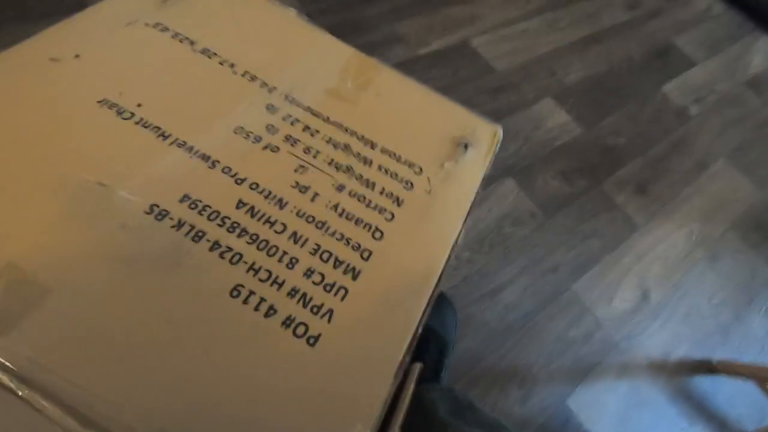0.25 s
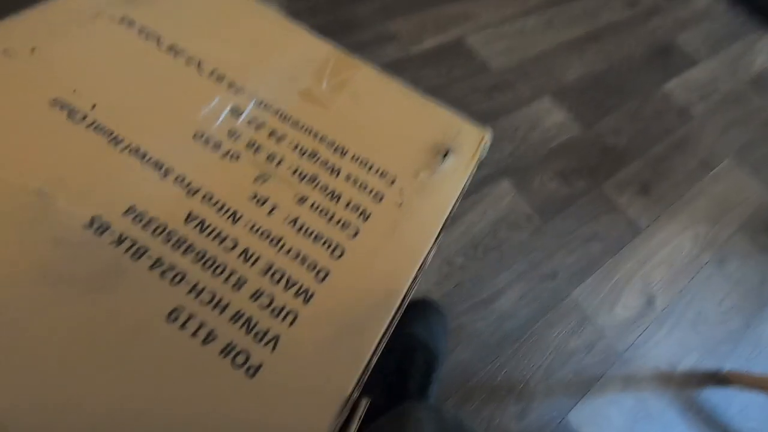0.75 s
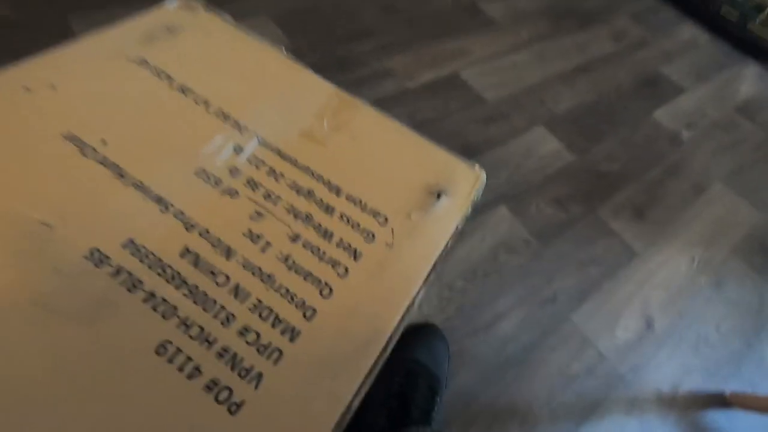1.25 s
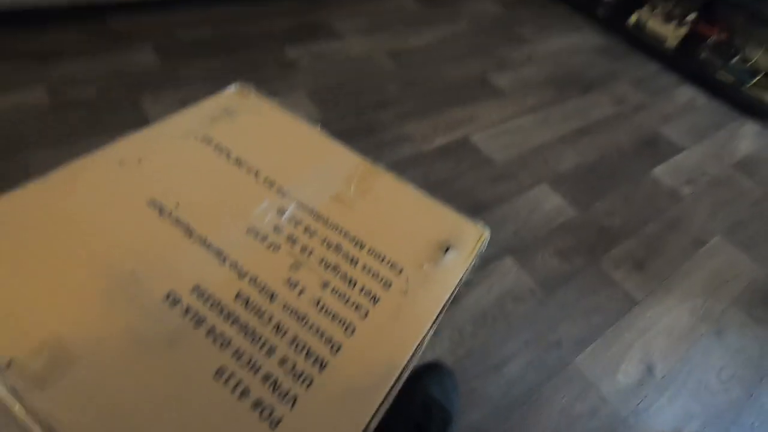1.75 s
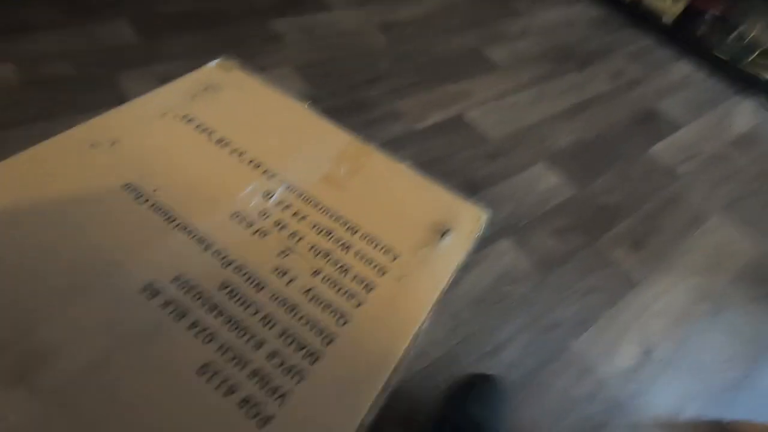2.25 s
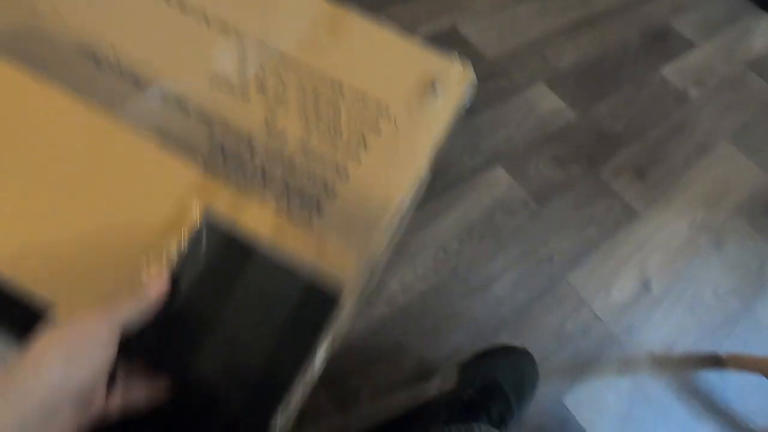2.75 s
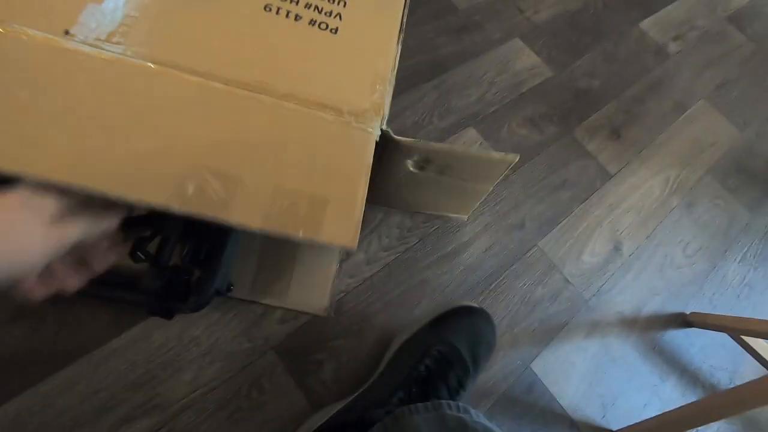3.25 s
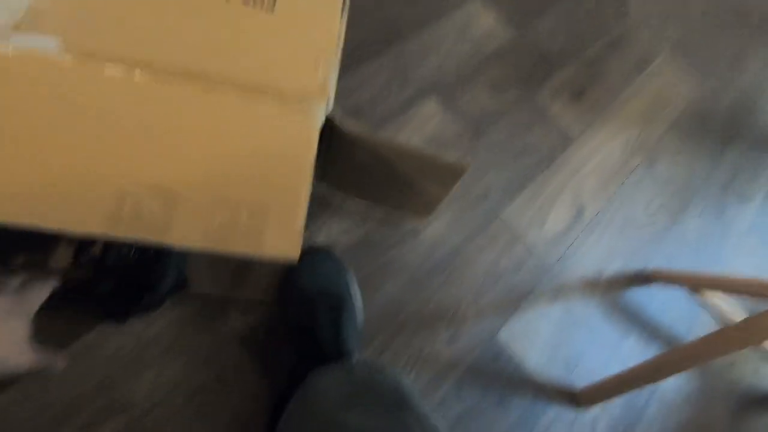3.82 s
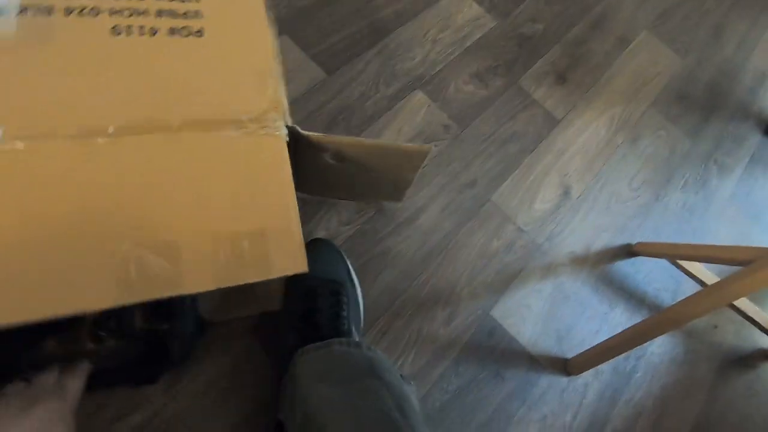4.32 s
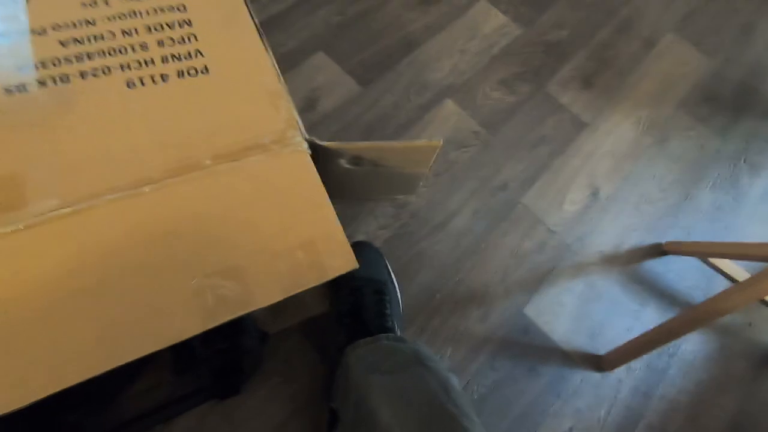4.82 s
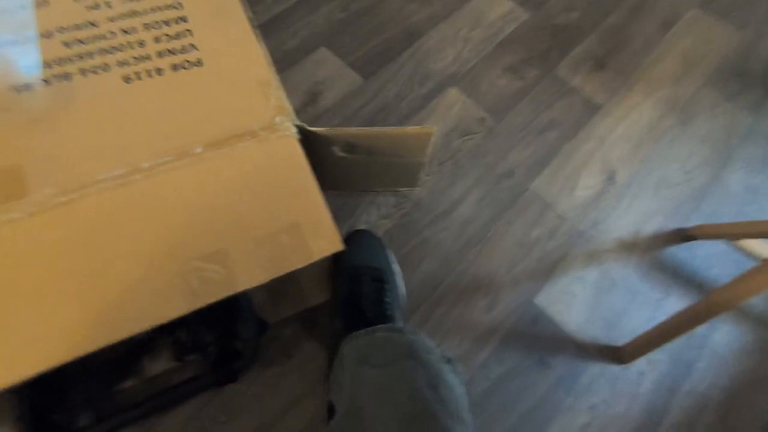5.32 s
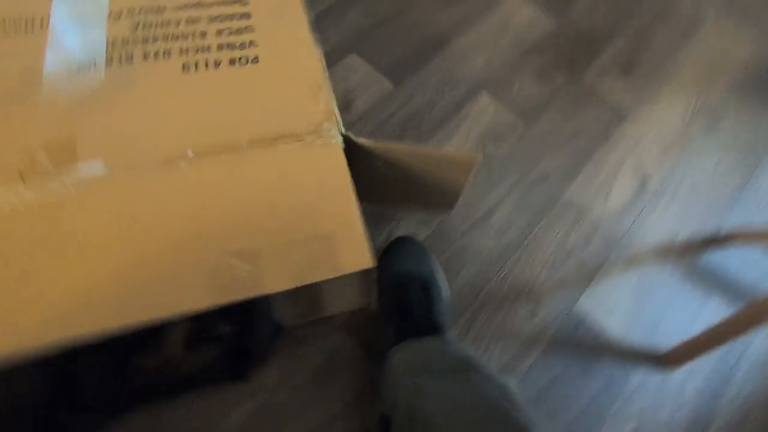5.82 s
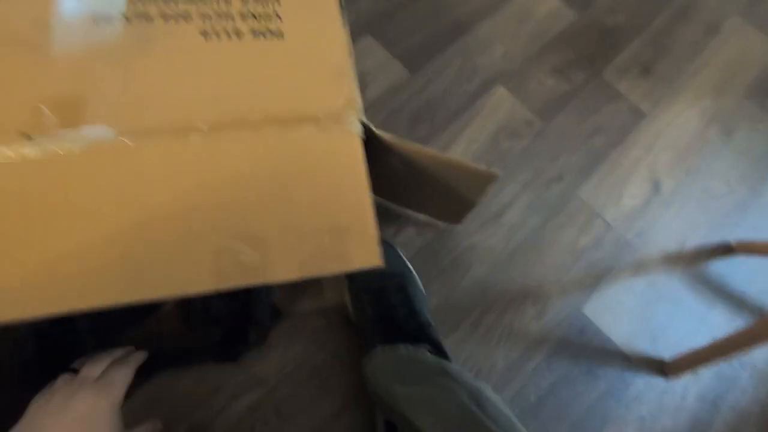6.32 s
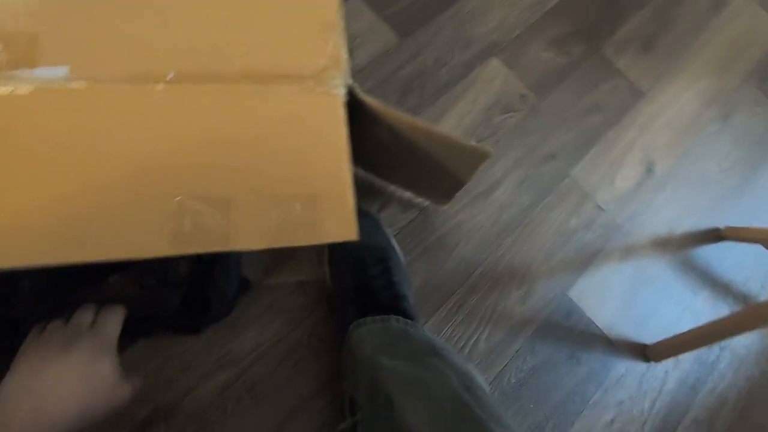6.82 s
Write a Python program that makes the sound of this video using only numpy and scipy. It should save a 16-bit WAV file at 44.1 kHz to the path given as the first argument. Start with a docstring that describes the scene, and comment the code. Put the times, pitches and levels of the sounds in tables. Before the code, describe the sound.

Close up in a quiet room, a large cardboard box is shifted on a hard floor. Rubbing and hollow drumming come with sharp cracks and a run of dull bumps, then thin out. Small crackles lead to a long bright scrape with a short groan and snaps. After a near-lull, a heavier thud and boomy drumming follow, then scattered knocks and rustles over faint hiss and low hum.

```python
"""Large cardboard carton on a hard floor

A carton is tipped, dragged and opened close to a two-port microphone. Paper rubs in swells of shaped noise;
random slips and blows set the panels drumming, and soft low thumps swing below. Folds and tape snap, a small
part pings nearer the right port, corners rasp, an edge groans, a thin tone rings and a stiff edge is rubbed.
Under it lies a quiet room: steady hiss and a low wavering hum, with a short reverberation on the box."""
import sys
import numpy as np
from scipy import signal
from scipy.io import wavfile
from scipy.ndimage import uniform_filter1d

SR = 44100
rng = np.random.default_rng(int(sys.argv[2]) if len(sys.argv) > 2 else 0)


def dump_mix(stems):
    """Bounce the given channels to the path in sys.argv[1] as a 16-bit WAV at rate SR."""
    frames = np.atleast_2d(stems).T  # one column per channel
    limited = np.clip(frames, -1, 1)  # hard clip at full scale
    pcm = np.round(limited * 32767).astype(np.int16)
    wavfile.write(sys.argv[1], SR, pcm)


N = 311787  # length in samples
GRID = np.arange(0, N + 128, 128) / SR  # slow time grid, s
PANEL_SPREAD = 1.085  # the panels swell and fade this much slower than the rubbing

# Each push, pull or fold of the box. Each row: peak time in seconds, rise in seconds, fall in seconds,
# relative rubbing level in dB, relative brightness in dB, relative panel drumming level in dB.
STROKE_ROWS = [(0.0, .05, 0.037, -34, -13, -29), (.13, 0.38, 0.13, -35.5, -1.5, -32.5),
               (.24, 0.27, 0.12, -38, -9, -29), (.44, 0.24, 0.37, -41.5, -5, -37),
               (.69, 0.13, 0.12, -41.5, -9.5, -31), (.85, 0.19, 0.39, -44.5, -7, -35.5),
               (1.05, 0.26, 0.11, -47, -4.5, -55), (1.5, 0.3, 0.45, -47, -2, -41),
               (1.66, 0.2, 0.19, -48.5, -6, -37.5), (1.75, 0.083, 0.079, -51.5, 5, -60),
               (1.886, 0.12, 0.18, -40.5, -3, -44), (2.1, 0.2, 0.43, -50, -1, -40),
               (2.33, 0.11, 0.19, -49, 1, -63), (2.45, 0.056, 0.32, -43.5, 0, -43.5),
               (2.72, 0.17, 1, -35, -5, -34.5), (3.03, 0.6, 0.37, -28.5, -4, -29),
               (3.35, 0.035, 0.058, -52.5, 14, -41), (3.47, 0.12, 0.21, -59, -5, -62),
               (3.62, 0.088, 0.042, -53.5, -22.5, -49.5), (3.86, 0.074, 0.36, -72, -24, -45.5),
               (4.05, 0.19, 0.3, -47.5, 5, -30.5), (4.32, 0.72, 0.34, -34.5, -6.5, -35),
               (4.469, 0.15, 0.39, -35.5, -5, -25.5), (4.779, 0.04, 0.12, -42.5, -5.5, -28),
               (5.05, 1, 0.27, -56.5, -5.5, -68), (5.37, 0.36, 0.18, -55, -6.5, -48.5),
               (5.56, 0.048, 0.12, -43, -6.5, -40.5), (5.72, 0.12, 0.25, -40, -6.5, -32.5),
               (5.863, 0.24, 0.15, -32, -5, -25.5), (6.12, 0.16, 0.47, -51.5, -6, -46),
               (6.421, 0.2, 0.16, -37.5, -4, -27.5), (6.64, 0.31, 0.2, -57.5, -1.5, -45.5),
               (6.8, 0.078, 0.27, -48.5, -9, -41.5), (6.98, 0.17, 1, -43.5, -7, -35.5)]
# The box lands or is knocked. Each row: start in seconds, relative level in dB, settled pitch in Hz,
# time to fall 60 dB in seconds.
THUMP_ROWS = [(0.219, -29, 198, 0.18), (0.287, -20.5, 66, 0.065), (0.38, -17, 150, 0.053),
              (0.689, -22.5, 99, 0.089), (0.72, -28.5, 69, 0.13), (0.833, -22, 122, 0.073),
              (0.918, -29, 72, 0.13), (1.02, -32.5, 204.3, 0.35), (1.069, -32, 167, 0.2),
              (1.64, -22, 164, 0.095), (1.85, -30.5, 187, 0.088), (1.9, -14, 152.4, 0.093),
              (2.069, -27.5, 218, 0.12), (2.179, -31, 303, 0.14), (2.55, -32.5, 202, 0.39),
              (2.627, -27, 217, 0.35), (3.587, -31, 166, 0.1), (4.425, -31, 387, 0.19),
              (4.43, -31, 102, 0.12), (4.487, -23.5, 75, 0.31), (4.765, -22.5, 215, 0.11),
              (4.768, -11, 68, 0.087), (4.808, -24, 43.7, 0.19), (5.566, -20, 79.2, 0.064),
              (6.07, -38.5, 196, 0.11), (6.289, -27, 303, 0.093), (6.325, -21.5, 186, 0.11),
              (6.85, -29.5, 171, 0.08), (6.891, -31.5, 193, 0.14)]


def amp(db):
    """Gain of a level in dB."""
    return 10 ** (np.asarray(db) / 20)


def evened(x):
    """Scaled to rms 1."""
    return x / np.sqrt(np.mean(x ** 2) + 1e-20)


def read(points, hz):
    """A table over frequency, read at the given frequencies on a logarithmic axis."""
    f, value = np.transpose(points)
    return np.interp(np.log(hz + 1), np.log(f + 1), value)


def curve(rows, order, t):
    """One column of a table at the times t."""
    return np.interp(t, [r[0] for r in rows], [r[order] for r in rows])


def add(mix, s, sound):
    """Adds a sound at s seconds."""
    part = mix[..., round(s * SR):][..., :sound.shape[-1]]
    part += sound[..., :part.shape[-1]]


def sides(db):
    """Left and right gain of a left-right difference in dB."""
    return amp(np.array([db / 2, -db / 2]))


def smooth(power):
    """Gain for every sample from a power given every 128 samples."""
    return np.interp(np.arange(N), np.arange(len(power)) * 128, np.sqrt(power))


def resonate(x, hz, width):
    """Shifts hz, fixed or moving, down to zero, smooths and shifts back: a resonance of gain 1."""
    turn = np.exp(2j * np.pi * np.cumsum(hz * np.ones(x.shape[-1])) / SR)
    r = np.exp(-np.pi * width / SR)
    return 2 * (turn * signal.lfilter([1 - r], [1, -r], x / turn)).real


def resonate_twice(x, hz, width):
    """Two equal resonances in a row, for steeper skirts."""
    return resonate(resonate(x, hz, width), hz, width)


def hiss(field_db):
    """Noise at the two ports with the level field_db(hz, t), made from random short-time spectra."""
    # Each row: frequency in Hz, left-right likeness from 0 to 1.
    likeness = [(200, 0.39), (500, 0.87), (1000, 0.24), (2200, 0.55), (4500, 0.67), (7000, 0.021)]
    # Each row: frequency in Hz, left-right difference in dB.
    balance = [(500, -1), (1200, 1), (4500, -0.5), (8500, -2.5), (12000, 0)]
    frames, hz = N // 128 + 5, np.fft.rfftfreq(512, 1 / SR)[:, None]
    a, b, c, d = rng.standard_normal((frames, 257, 4)).T
    same = np.clip(read(likeness, hz), 0, 1)
    left = a + 1j * b
    right = same * left + np.sqrt(1 - same ** 2) * (c + 1j * d)
    level = amp(field_db(hz, np.arange(frames) * 128 / SR))
    z = np.array([left, right]) * sides(read(balance, hz)) * level
    return signal.istft(z, nperseg=512, noverlap=384)[1][:, :N]


def strokes(order, spread, t):
    """Power of every stroke at the times t, one row each, from the level column given by order."""
    s, rise, fall, db = np.transpose(STROKE_ROWS)[[0, 1, 2, order], :, None]
    # distance from the peak: 1 is one rise before or one fall after, stretched by spread
    before, after = (s - t) / np.maximum(rise, .02), (t - s) / np.maximum(fall, .02)
    away = np.where(t < s, before, after) / spread
    return amp(2 * np.maximum(db - 24 * away ** 1.52, -140))  # 24 dB down at distance 1


def shakes(over_db, db_per_octave, t60):
    """Power of the shaking that the thumps leave behind, weighted by their pitch around 70 Hz."""
    s, db, hz = np.transpose(THUMP_ROWS)[:3, :, None]
    after = np.maximum(GRID - s, 0)
    level = db + over_db + db_per_octave * np.log2(hz / 70) - 60 * after / t60
    return ((GRID > s) * amp(2 * level)).sum(0)


def quiet():
    """The room at rest: steady hiss, and a low hum of narrow-band noise that wavers."""
    # Each row: frequency in Hz, relative level in dB per Hz.
    spectrum = [(20, 0.5), (64, 6), (110, 17.5), (200, 4.5), (390, -16), (770, -29), (1400, -6),
                (3000, -13), (6000, -28), (8700, -17.5), (15000, -74)]
    hum = evened(resonate_twice(rng.standard_normal(N), 65.6, 10.4))
    air = evened(hiss(lambda hz, t: read(spectrum, hz) + 0 * t))
    return amp(-55.5) * air + amp(-54.5) * hum


def scrape():
    """Paper fibres rubbing: dense grains in patches, as bright as the stroke that sounds."""
    # Each row: frequency in Hz, relative level in dB per Hz.
    spectrum = [(180, -36), (300, -11), (450, -11), (610, -8), (900, -9), (1300, -9), (2000, -13),
                (3200, -14), (5000, -18), (8000, -18.5), (15000, -29)]

    def field_db(hz, t):
        """Level over frequency and time: spectrum, brightness tilt and random patches."""
        patches = uniform_filter1d(rng.standard_normal((len(hz), len(t))), size=5, axis=0)
        patches = evened(uniform_filter1d(patches, size=14, axis=1))
        power = strokes(order=3, spread=0.92, t=t)
        bright = np.transpose(STROKE_ROWS)[4] @ power / power.sum(0)  # the loudest stroke decides
        tilt = (bright + 4.64) * np.clip(np.log2(hz / 1500 + 1e-3) / 1.65, -.9, 1.2)
        return read(spectrum, hz) + tilt + 1.64 * patches

    # fibres catch and let go: short louder flecks, about 200 a second
    flecks = amp(3.5 * np.minimum(rng.exponential(1, N), 3)) * (rng.random(N) < 200 / SR)
    catches = signal.oaconvolve(flecks, np.hanning(90), "same")
    grain = 1 + .1 * catches / catches.mean()
    power = strokes(order=3, spread=1, t=GRID).sum(0)
    return evened(hiss(field_db) * grain) * smooth(power) * amp(2.5)


def drumming(modes, power, per_s, spread_db):
    """Uneven slips of the dragged box kick its modes, which ring briefly."""
    kicks = rng.standard_normal(N) * amp(spread_db * np.minimum(rng.exponential(1, N), 3))
    kicks = kicks * (rng.random(N) < per_s / SR)
    ring = sum(amp(db) * resonate_twice(kicks, hz, 1.33 * w) / np.sqrt(w) for hz, w, db in modes)
    # level evened over 3000 samples, so that power alone sets the swells
    loud = np.sqrt(abs(uniform_filter1d(ring ** 2, size=3000)) + 1e-12)
    return ring / loud * smooth(power)


def panels():
    """The flat sides drum with each stroke and rattle on after a thump, most after a high one."""
    # Each row: frequency in Hz, nominal width in Hz, relative level in dB.
    modes = [(135.4, 43, -5), (158.2, 23.6, 1), (180.3, 35.4, 2.5), (213, 19, 1), (258.4, 23.7, -4.5),
             (297.8, 24.7, -2.5), (342.3, 37, -4.5), (390.3, 36, -9.5), (594, 57, -13)]
    force = strokes(order=5, spread=PANEL_SPREAD, t=GRID).sum(0)
    rattle = shakes(over_db=-16, db_per_octave=2.5, t60=0.23)
    return amp(-3.0) * drumming(modes, force + rattle, per_s=400, spread_db=3.0)


def shudder():
    """The whole box shudders low under the strokes and shakes after a thump, most after a deep one."""
    # Each row: frequency in Hz, nominal width in Hz, relative level in dB.
    modes = [(42, 75, -38), (61, 48, 4), (79, 23, 4.5)]
    force = strokes(order=5, spread=PANEL_SPREAD, t=GRID).sum(0) * amp(2 * -15)
    shake = shakes(over_db=-11.5, db_per_octave=-3, t60=0.42)
    return drumming(modes, force + shake, per_s=120, spread_db=3.5)


def snaps():
    """Folds and tape: a crack of a few milliseconds, part broad, part ringing in one stiff patch of board."""
    # Each row: start in seconds, relative peak level in dB, ringing frequency in Hz,
    # broad crack against the ringing in dB, time to fall 60 dB in seconds.
    rows = [(0.028, -14.5, 5430, 5.5, 0.012), (0.1026, -14, 5520, 9, 0.0068), (0.372, -32, 900, 5, 0.019),
            (0.682, -29.5, 667, -1, 0.023), (0.8267, -34, 775, 6, 0.019), (0.843, -32.5, 600, 19, 0.016),
            (1.6146, -38.5, 1090, 7, 0.027), (1.6407, -36.5, 1200, 4, 0.015),
            (2.0893, -36, 2560, 6, 0.0075), (2.146, -37, 2450, 14, 0.0091), (2.282, -43, 5000, 9, 0.0095),
            (2.3143, -37, 6600, 6, 0.0084), (2.327, -36, 6490, 5, 0.016), (2.407, -40, 7000, -3, 0.008),
            (2.435, -31, 2602, 9, 0.0071), (2.4702, -29.5, 1980, 17.5, 0.0043),
            (2.4999, -32.5, 6515, 3, 0.0078), (2.5282, -29, 6040, 9, 0.0074), (2.576, -35, 7030, 0, 0.0074),
            (2.705, -29.5, 636, 3, 0.055), (3.075, -21, 4870, 6, 0.01), (3.325, -20, 3990, 12, 0.0048),
            (3.3306, -29, 4150, 8, 0.014), (3.3346, -32, 3300, 15, 0.04), (3.398, -30.5, 2450, -8, 0.015),
            (3.507, -47, 2580, -9.5, 0.013), (3.5943, -25, 1300, 11, 0.018), (4.7628, -27, 950, 2.5, 0.016),
            (4.7775, -27.5, 4650, 6, 0.0064), (4.782, -37, 2300, 13, 0.022), (5.047, -53, 1470, -8, 0.011),
            (5.523, -38, 894, 5, 0.018), (5.538, -38, 3620, 1, 0.013), (5.558, -35, 3100, 6, 0.021),
            (6.174, -39, 2430, 3, 0.013), (6.7381, -48.5, 729, 0, 0.012), (6.776, -29, 780, 6.5, 0.012),
            (6.8467, -42, 630, -2, 0.013), (6.9563, -24, 690, 2.5, 0.015)]
    out, t = np.zeros((2, N)), np.arange(1800) / SR
    for (s, db, hz, broad_db, t60), burst in zip(rows, rng.standard_normal((len(rows), 3, 1800))):
        t60 = max(t60, .003)
        fade = amp(-60 * t / t60) * (1 - np.exp(-t / (0.081 * t60)))
        burst = (burst[0] + .5 * burst[1:]) * fade  # one noise shared by the ports, one of each port's own
        swing = burst + .4 * fade * np.sin(2 * np.pi * hz * t)
        ring = resonate_twice(swing, hz, 320 + .09 * hz)
        # the flap adds body, higher for a higher snap
        body = resonate_twice(burst, 900 + 0.56 * hz, 3300)
        broad = resonate(burst, 2800, 6500) + 5.4 * body
        crack = ring / abs(ring).max() + amp(broad_db) * broad / abs(broad).max()
        add(out, s, amp(db + 5.5) * crack / abs(crack).max())
    return out


def thumps():
    """Each blow is a soft push that swings a few cycles, sagging in pitch."""
    out, t = np.zeros(N), np.arange(9000) / SR
    for s, db, hz, t60 in THUMP_ROWS:
        swing = np.sin(2 * np.pi * hz * (t + 0.0016 * (1 - np.exp(-t / 0.0024))))
        fade = amp(db + 5.0 - 60 * t / max(t60, .02))
        add(out, s, fade * (1 - np.exp(-t / 0.0072)) * swing)
    return out


def pings():
    """A small hard part: short clusters of high modes, each blow a little different, nearer the right port."""
    # Each row: start in seconds, relative level in dB.
    blows = [(1.0767, -49.5), (3.991, -37), (5.106, -54), (6.1774, -52.5), (6.3844, -49), (6.5665, -48.5),
             (6.7999, -48)]
    # Each row: frequency in Hz, nominal width in Hz, relative level in dB, time to fall 60 dB in seconds.
    modes = [(8800, 570, -4.5, 0.18), (14500, 250, -13, .2)]
    out, t = np.zeros(N), np.arange(9000) / SR
    for (s, blow_db), jingle in zip(blows, rng.standard_normal((len(blows), 9000))):
        for hz, w, db, t60 in modes:
            fade = amp(blow_db + db - 60 * t / t60)
            add(out, s, fade * evened(resonate_twice(jingle, hz, w)))
    return out * sides(-11.5)[:, None]


def squeak(rows, partials, width, clean):
    """Noise in a few resonances that move together, with a share of clean tone."""
    t = np.arange(rows[0][0], rows[-1][0], 1 / SR)
    ring = np.zeros(len(t))
    for multiple, db in partials:
        hz = multiple * curve(rows, order=1, t=t)
        fuzz = evened(resonate_twice(rng.standard_normal(len(t)), hz, width))
        tone = np.sin(2 * np.pi * np.cumsum(hz) / SR)
        ring += amp(db) * (clean * tone + (1 - clean) * fuzz)
    return ring * amp(curve(rows, order=2, t=t)) * signal.windows.tukey(len(t), .03)


def add_rasps(mix):
    """A corner rasps briefly during the long drag: one gliding, mostly noisy resonance each time."""
    # Each row: start in seconds, length in seconds, first frequency in Hz, last frequency in Hz,
    # relative level in dB.
    rows = [(2.841, 0.032, 2050, 2140, -33.5), (2.952, 0.062, 1360, 1100, -34),
            (2.957, 0.032, 1980, 1920, -36)]
    for s, length, from_hz, to_hz, db in rows:
        glide = [(s, from_hz, db), (s + length, to_hz, db)]
        add(mix, s, squeak(glide, [(1, 0)], width=160, clean=.3))


def groan(rows):
    """Regular stick-slip pulses, every second one a little different, slightly unsteady."""
    t = np.arange(rows[0][0], rows[-1][0], 1 / SR)
    jitter = 1 + 0.041 * evened(uniform_filter1d(rng.standard_normal(len(t)), size=200))
    # half the tabled frequency: the second partial is the strong one
    phase = np.pi * np.cumsum(curve(rows, order=1, t=t) * jitter) / SR
    partials_db = [-38.0, 2.0, -30.0, -8.5, -24.0, -20.0]
    tone = sum(amp(db) * np.sin(k * phase) for k, db in enumerate(partials_db, 1))
    return amp(curve(rows, order=2, t=t)) * tone * signal.windows.tukey(len(t), .15)


def add_groans(mix):
    """An edge judders as it drags, sticking and slipping."""
    # One list for each groan. Each row: time in seconds, second partial in Hz, relative level in dB.
    groan_tables = [
        [(2.96, 254, -37), (3.02, 319.6, -26), (3.07, 307, -34.5), (3.13, 253.3, -31), (3.19, 209.2, -30),
         (3.24, 172, -32.5)],
        [(4.43, 271.7, -64), (4.5, 289.4, -29.5), (4.6, 305.4, -37.5), (4.66, 255, -46)],
    ]
    for rows in groan_tables:
        add(mix, rows[0][0], groan(rows))


def add_thin_tone(mix):
    """A thin, nearly clean tone rings on after a tap and is rubbed awake again."""
    # Each row: time in seconds, frequency in Hz, relative level in dB.
    rows = [(3.596, 1250, -38), (3.645, 1250, -46), (3.69, 1250, -61), (3.78, 1250, -53),
            (3.865, 1252, -44), (3.92, 1255, -47), (3.95, 1255, -59)]
    # Each row: multiple of that frequency, relative level in dB.
    partials = [(1, 0), (1.256, -8)]
    add(mix, rows[0][0], squeak(rows, partials, width=25, clean=.9))


def add_edge_rub(mix):
    """A hand rubs a stiff edge as the box is about to land: resonant noise that climbs in pitch."""
    # Each row: time in seconds, frequency in Hz, relative level in dB.
    rows = [(5.455, 1400, -60), (5.5, 1500, -51), (5.545, 1720, -43), (5.575, 1750, -56)]
    # Each row: multiple of that frequency, relative level in dB.
    partials = [(.5, -8), (1, 0), (2, -15)]
    add(mix, rows[0][0], squeak(rows, partials, width=550, clean=0))


def room(x):
    """Reverberation from sparse taps of random sign, each band dying at its own speed."""
    # Each row: frequency in Hz, time to fall 60 dB in seconds.
    decay = [(150, 0.061), (1000, 0.12), (4000, 0.31), (10000, 0.49)]
    taps = np.zeros((2, 20000))
    at = np.arange(120, 19960, 20) + rng.integers(0, 20, (2, 992))  # one in every 20 samples
    np.put_along_axis(taps, at, rng.choice([-1., 1.], at.shape), 1)
    hz, t, z = signal.stft(taps, SR, nperseg=256)
    fade = amp(-60 * t / read(decay, hz)[:, None])
    tail = signal.istft(z * fade, SR, nperseg=256)[1]
    return signal.fftconvolve(x, tail / np.linalg.norm(tail[0]), axes=1)[:, :N]


def scene():
    """The box in the room: the thin tone, the scrape and the quiet stay out of the reverberation."""
    box = panels() + shudder() + thumps()
    add_rasps(box)
    add_groans(box)
    add_edge_rub(box)
    sharp = snaps() + pings()
    lows = box + amp(-6) * room(np.array([box, box]))
    add_thin_tone(lows)
    return lows + sharp + amp(-9) * room(sharp) + scrape() + quiet()


def record(dry):
    """The microphone falls off steeply to a low shelf in the top octave; then the band ends at 15.7 kHz."""
    main = signal.sosfilt(signal.butter(9, 9400, fs=SR, output="sos"), dry)
    top = signal.sosfilt(signal.butter(4, 10500, "high", fs=SR, output="sos"), dry)
    edge = signal.firwin(1023, 15700, window=("kaiser", 9), fs=SR)
    return signal.oaconvolve(main + amp(-22.0) * top, edge[None], "same")


dry = scene()
out = record(dry)
dump_mix(out)
```